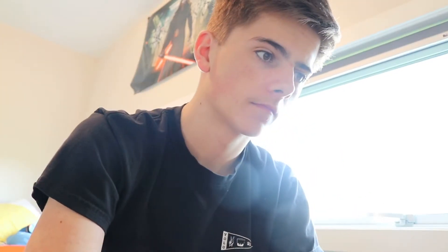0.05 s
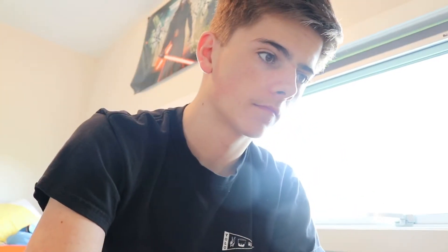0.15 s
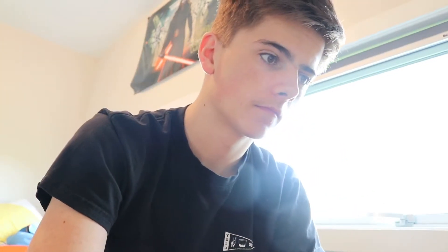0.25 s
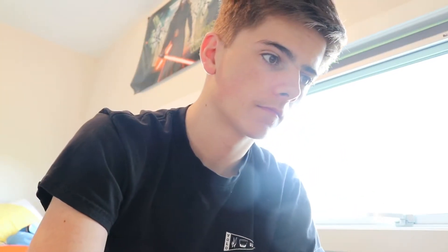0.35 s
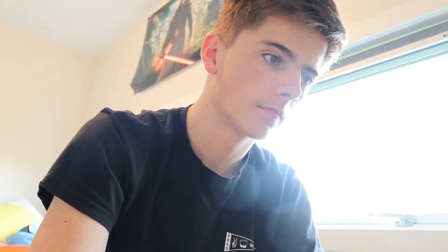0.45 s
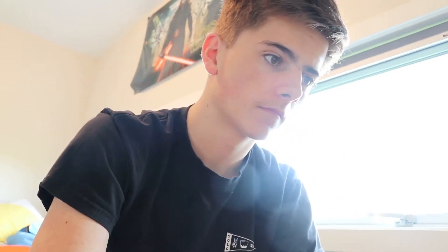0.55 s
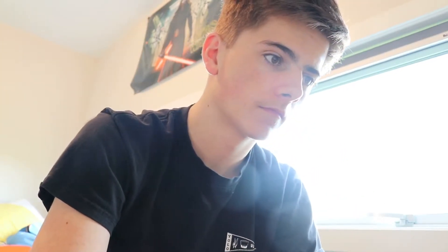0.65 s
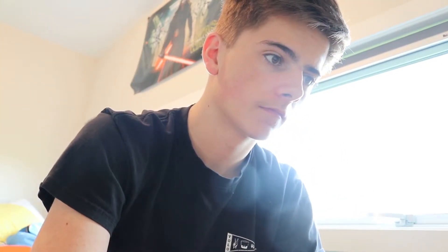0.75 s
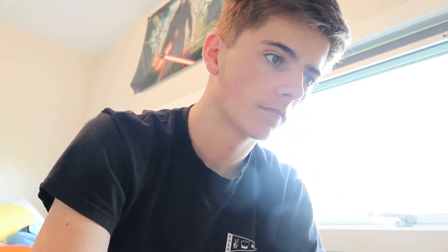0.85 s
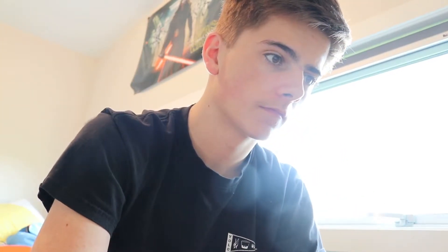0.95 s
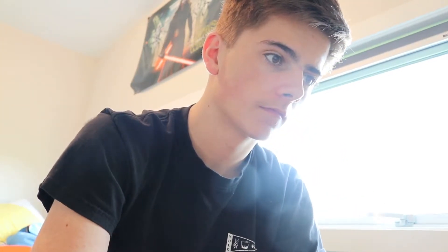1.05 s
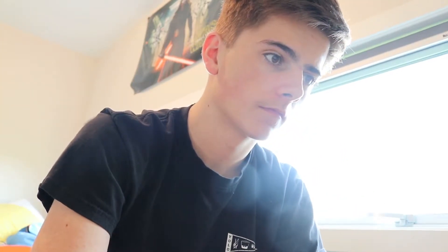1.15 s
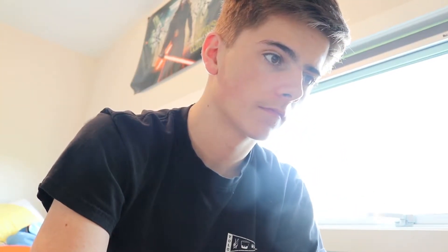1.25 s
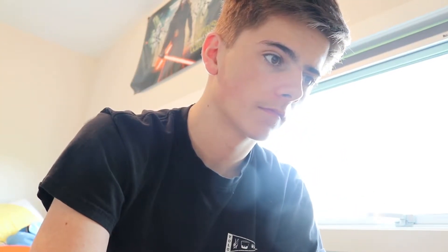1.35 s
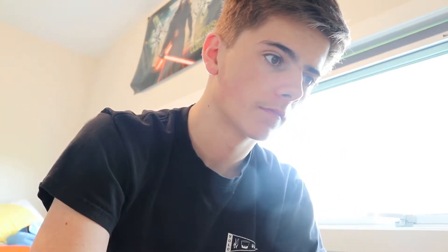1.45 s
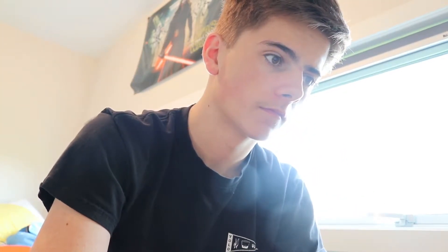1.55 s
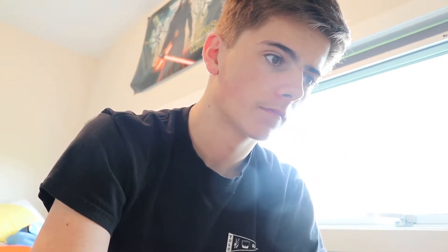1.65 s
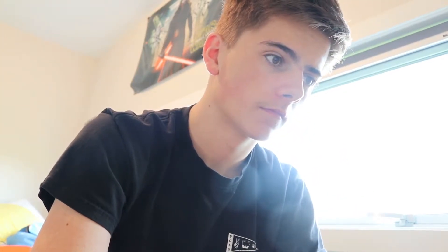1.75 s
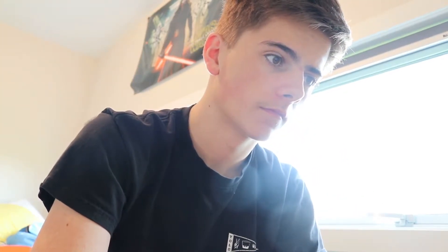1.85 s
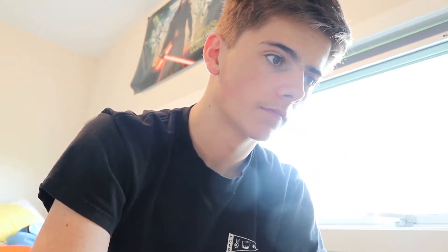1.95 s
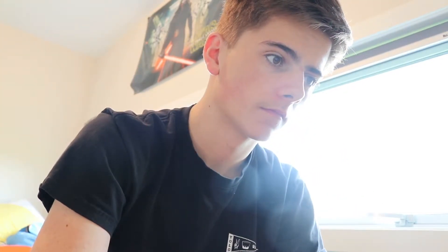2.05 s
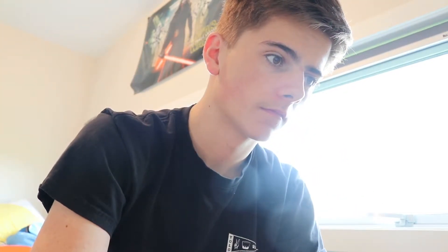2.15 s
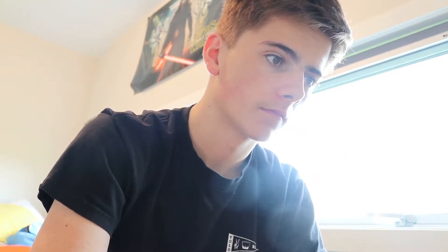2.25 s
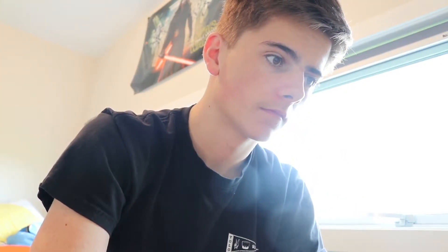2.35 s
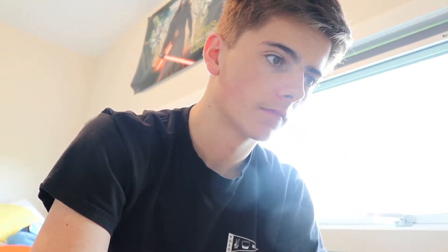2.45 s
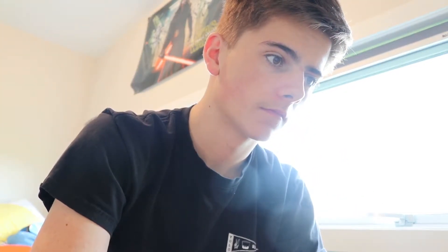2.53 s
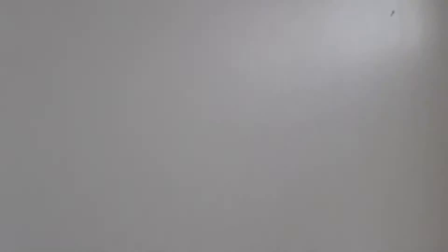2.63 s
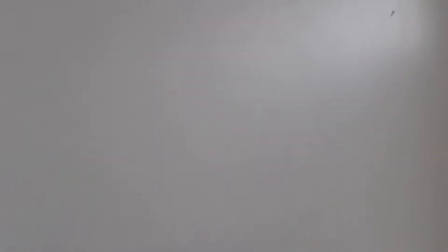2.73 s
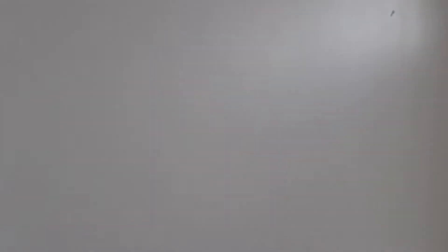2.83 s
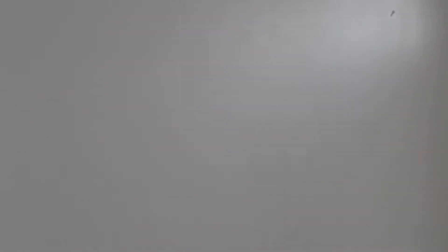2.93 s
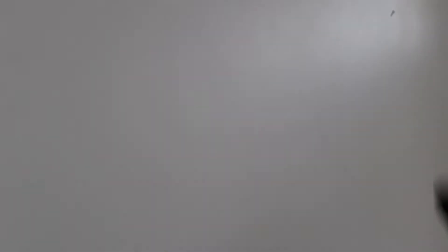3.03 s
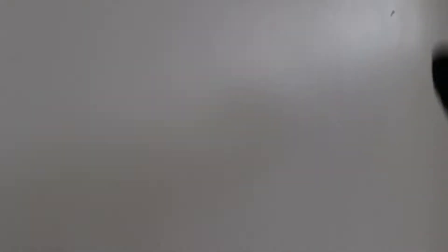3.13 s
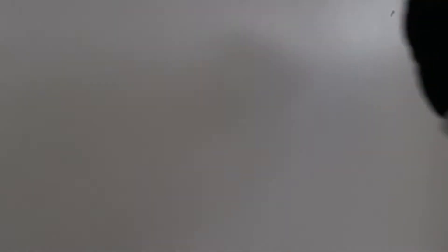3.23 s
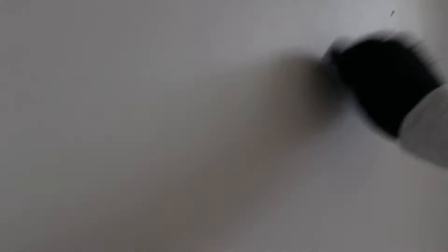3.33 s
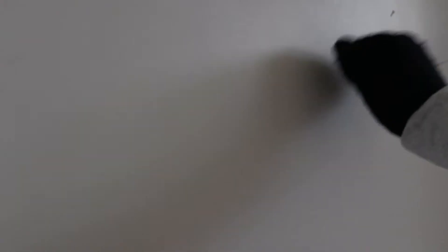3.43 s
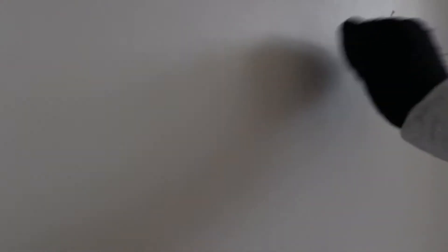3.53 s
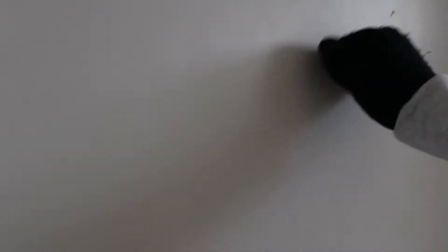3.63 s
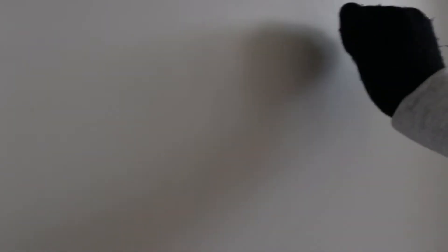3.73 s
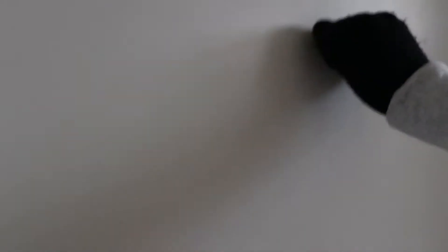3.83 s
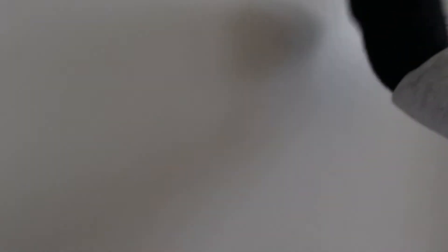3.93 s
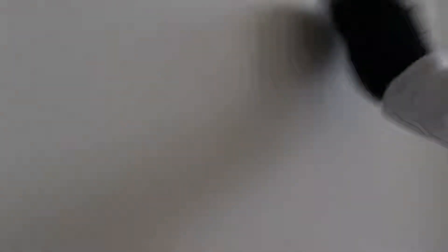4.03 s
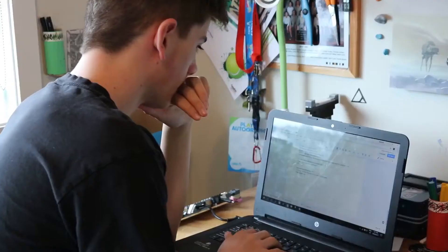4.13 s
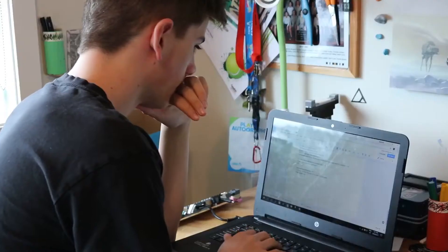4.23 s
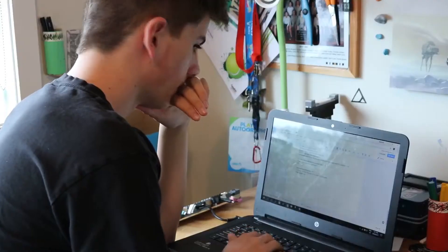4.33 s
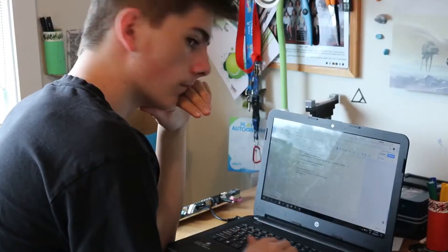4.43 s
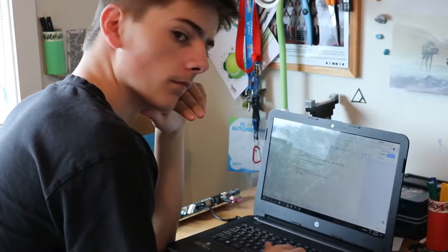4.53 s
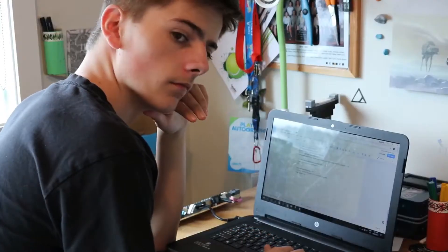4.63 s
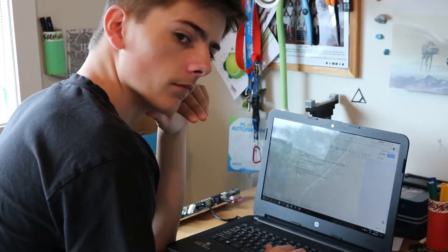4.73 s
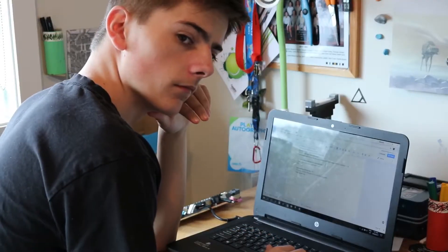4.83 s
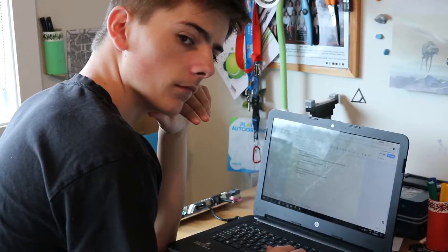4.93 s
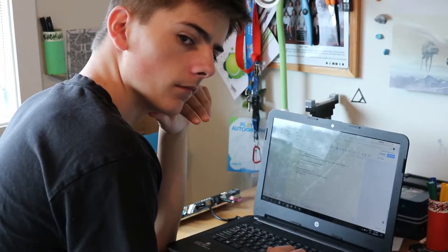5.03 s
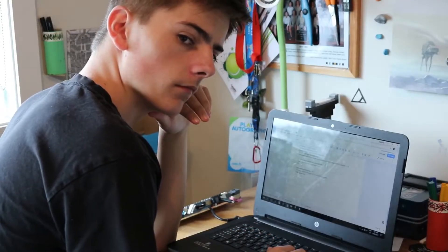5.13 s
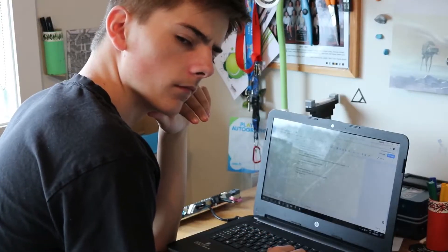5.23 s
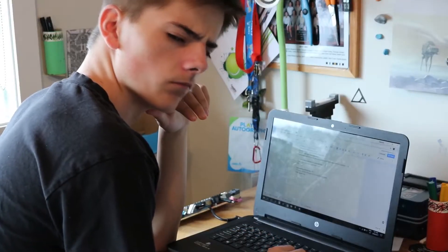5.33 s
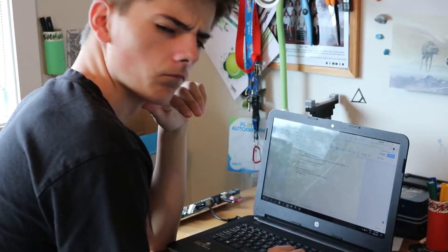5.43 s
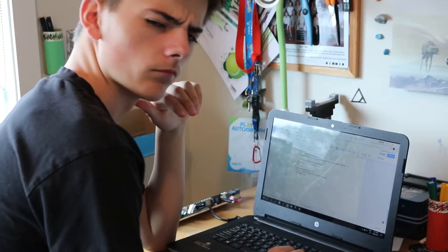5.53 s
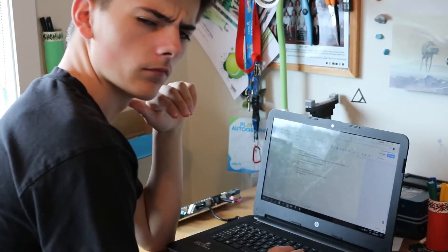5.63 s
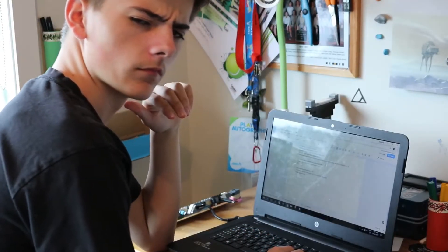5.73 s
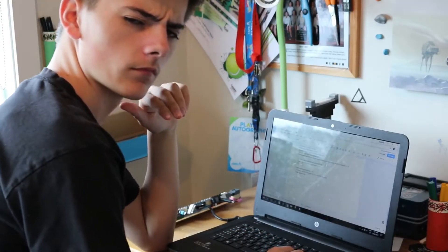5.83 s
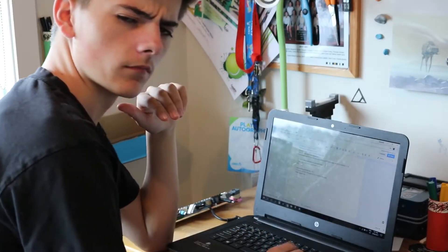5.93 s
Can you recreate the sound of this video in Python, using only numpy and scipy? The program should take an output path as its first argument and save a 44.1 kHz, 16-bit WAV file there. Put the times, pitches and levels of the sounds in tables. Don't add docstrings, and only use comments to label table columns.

```python
import sys
import numpy as np
from scipy import signal
from scipy.io import wavfile
from scipy.ndimage import uniform_filter1d

SR = 44100
rng = np.random.default_rng(int(sys.argv[2]) if len(sys.argv) > 2 else 0)


def wav_record(signal):
    frames = np.transpose(np.atleast_2d(signal))
    bounded = np.clip(frames, -1, 1)
    quanta = np.round(bounded * 32767).astype(np.int16)
    wavfile.write(sys.argv[1], SR, quanta)


def elevation(decibels):
    levels = np.asarray(decibels, float)
    return 10 ** (levels / 20)


N = 263718

CUT_S = 4.533
LEFT_LAG, DOOR_LAG = 7, 3

# f/Hz, level/dB per Hz
CLACK_COLOUR = [(530, -50.5), (900, -1), (1430, -5.5), (2070, -14.5), (3330, 4), (3950, -1.5), (4800, -9),
                (6240, -51), (10600, -120)]
# f/Hz, likeness/0..1
AIR_LIKENESS = [(60, 0.68), (130, 0.91), (290, 0.38), (640, 0.22), (1410, 0.061), (3100, 0), (6820, 0),
                (15000, 0)]


def evened(x):
    return x / np.sqrt(np.mean(x ** 2) + 1e-20)


def read(points, hz):
    f, value = np.transpose(points)
    return np.interp(np.log(hz + 1), np.log(f + 1), value)


def curve(s, level_db):
    gain = elevation(np.interp(np.arange(N) / SR, s, level_db, left=-120, right=-120))
    return uniform_filter1d(gain, size=1200)


def add(mix, s, sound):
    at = round(s * SR)
    sound = sound[:, max(-at, 0):]
    part = mix[:, max(at, 0):][:, :sound.shape[1]]
    part += sound[:, :part.shape[1]]


def noise(size, colour, same, t60=None, patchy_db=0., order=512):
    hop = order // 4
    frames, hz = size // hop + 5, np.fft.rfftfreq(order, 1 / SR)
    a, b, c, d, patches = rng.standard_normal((frames, len(hz), 5)).T
    patches = uniform_filter1d(patches, size=6, axis=0)
    patches = evened(uniform_filter1d(patches, size=12, axis=1))
    same = np.clip(read(same, hz), -1, 1)[:, None]
    left = a + 1j * b
    right = same * left + np.sqrt(1 - same ** 2) * (c + 1j * d)
    level_db = read(colour, hz)[:, None] + patchy_db * patches
    scale = np.sqrt(np.mean(elevation(2 * read(colour, hz))))
    if t60:
        level_db = level_db - 60 * np.arange(frames) * hop / SR / read(t60, hz)[:, None]
    spectra = np.array([left, right]) * elevation(level_db) / scale
    x = signal.istft(spectra, nperseg=order, noverlap=order - hop)[1][:, :size]
    return x / np.sqrt(order * 4 / 3)


def ring(modes, t, spread, beat_hz, share=0.099, build=1e-4):
    hz, level_db, t60 = np.transpose(modes)[:, :, None]
    detune, apart = rng.standard_normal((len(modes), 2)).T[:, :, None]
    decay = elevation(level_db - 60 * t / np.clip(t60, .02, 2))
    decay = decay * (1 - np.exp(-t / np.maximum(build, 1e-4)))
    turn = 2 * np.pi * hz * (1 + spread * detune) * t
    beat = 2 * np.pi * beat_hz * t
    upper = np.sin(turn + beat * (np.sign(apart) + apart / 2))
    lower = np.sin(turn - beat * np.sign(apart) * (2 + detune / 2) + detune)
    return (decay * (np.sin(turn) + share * (upper + lower))).sum(0) / 1.4


def causal(colour, size=1024):
    level_db = read(colour, abs(np.fft.fftfreq(size, 1 / SR)))
    log_gain = np.log(elevation(np.maximum(level_db, -100)))
    h = np.fft.ifft(np.exp(np.conj(signal.hilbert(log_gain)))).real[:size // 2]
    return h / abs(h).max()


def air():
    # f/Hz, level/dB per Hz
    room_colour = [(12, -48.5), (20, -13), (109, -2.5), (154, -10.5), (264, -4), (303, -12), (420, -9),
                   (720, -16), (1020, -14.5), (2000, -21.5), (2600, -51.5), (4400, -120)]
    hiss_colour = [(880, -19.5), (1500, -8), (1870, -11), (2020, -3), (2350, -1), (2640, -2), (3190, -3.5),
                   (5790, -8), (7270, -3.5), (11800, -5.5), (14300, -11.5), (15200, -7.5), (16100, -21.5)]
    rumble_colour = [(18, -58), (30, 0.5), (75, 1), (202, 2), (250, -8), (417, -4.5), (864, -12.5),
                     (983, -26), (1070, -14), (2400, -18.5), (5000, -44.5), (6500, -49.5), (11000, -120)]
    # f/Hz, level/dB
    hiss_edge = [(15600, 0), (16000, -40)]
    # t/s, level/dB
    outside = [
        (0, -65.5),
        (.6, -74.5),
        (.95, -71),
        (1.5, -66),
        (1.95, -76),
        (2.4, -64.5),
        (2.85, -70.5),
        (3.1, -64),
        (3.36, -69.5),
    ]
    hz = np.geomspace(800, 20000, num=200)
    edged = np.transpose([hz, read(hiss_colour, hz) + read(hiss_edge, hz)])
    room = elevation(-68.5) * evened(noise(N, room_colour, AIR_LIKENESS, patchy_db=2.0, order=1024))
    hiss = elevation(-71.5) * evened(noise(N, edged, AIR_LIKENESS, patchy_db=0.36))
    rumble = evened(noise(N, rumble_colour, AIR_LIKENESS, patchy_db=4.5, order=1024))
    return room + hiss + elevation(1.0) * curve(*np.transpose(outside)) * rumble


def thocks():
    # t/s, f/Hz, level/dB, t60/s
    case_rings = [(0.002, 636, -54.5, 0.05), (0.2228, 895, -32, 0.024), (0.226, 448, -48, 0.04),
                  (0.23, 1050, -41, 0.054), (0.28, 395, -53, 0.1), (0.299, 655, -53.5, 0.18),
                  (0.299, 426, -51.5, 0.15), (0.398, 661, -45, 0.069), (0.399, 476, -40.5, 0.07),
                  (0.474, 710, -60, 0.14), (1.294, 425, -51, 0.22), (1.297, 1043, -50, 0.15),
                  (1.3, 1880, -65, 0.24), (1.3, 1586, -59, 0.14), (1.536, 596, -65, 0.1),
                  (2.283, 423, -51, 0.18), (2.29, 1048, -55, 0.09), (2.405, 765, -61.5, 0.13),
                  (2.477, 446, -66, 0.05), (2.51, 660, -48, 0.053), (2.533, 662, -55, 0.12),
                  (2.682, 630, -45, 0.079), (2.93, 455, -61.5, 0.27), (2.945, 876, -55.5, 0.057)]
    out, t = np.zeros((2, N)), np.arange(SR // 4) / SR
    for s, *mode in case_rings:
        wave = ring([mode], t, 0, 15.0, share=0.27, build=0.0025)
        add(out, s, 2 * np.array([elevation(1.0) * np.roll(wave, LEFT_LAG), wave]))
    return out


def key(click_db, thump_db, body_db, clack_db, tail_db):
    # f/Hz, level/dB per Hz
    click_colour = [(2820, -28), (4800, -1), (5190, -2), (6250, 4), (6790, 4.5), (9110, 7.5), (10400, -2),
                    (13000, -5), (15800, -5), (16500, -26)]
    rattle_colour = [(710, -27), (1200, -2.5), (1580, -7), (2500, -4.5), (2850, -4), (5270, -8),
                     (6860, -1.5), (9130, -3.5), (15300, -10.5), (16000, -21.5), (16500, -47)]
    # f/Hz, t60/s
    rattle_t60 = [(1000, 0.47), (3000, 0.31), (8000, 0.34), (15000, 0.31)]
    # f/Hz, level/dB, t60/s
    desk_modes = [(226.4, 3, 0.12), (282, -23, 0.15), (352, -39, 0.045)]
    case_modes = [(449.5, 7.5, 0.055), (680, 2.5, 0.053), (1075, -4.5, 0.081), (1995, -25, 0.45)]
    t = np.arange(SR // 3) / SR

    grit = rng.standard_normal(len(t)) * elevation(3.7 * rng.exponential(1, len(t)))
    burst = (grit * (t / .0006) ** 2 * np.exp(-t / 0.00054))[:1000]
    click = signal.oaconvolve(burst, causal(click_colour))
    clack = signal.oaconvolve(burst, causal(CLACK_COLOUR))
    click = click / abs(click).max()
    clack = elevation(clack_db + 11.0) * clack / abs(clack).max()
    shaded = np.roll(elevation(-32.0) * click + elevation(-10.5) * clack, LEFT_LAG)
    near = elevation(6.0) * np.pad([shaded, click + clack], ((0, 0), (0, len(t) - len(click))))

    rattle_same = [(1000, 0.37), (8000, 0.072)]
    rattle = noise(len(t), rattle_colour, rattle_same, rattle_t60, patchy_db=2.5, order=256)
    wobble = evened(uniform_filter1d(rng.standard_normal(len(t)), size=90))
    shivers = elevation(0.98 * np.tanh(wobble))
    early = 1 + 3.6 * np.exp(-t / 0.0041)
    rattle = rattle * shivers * early * elevation([[-2.5], [0]]) * np.clip(t / 0.0051, 0, 1)

    desk = elevation(thump_db + 2.0) * ring(desk_modes, t, 0.016, 4.0) * (1 - np.exp(-t / 0.0097))
    case = elevation(body_db - 2.0) * ring(case_modes, t, .012, 12.) * (1 - np.exp(-t / 0.0092))
    wood_colour = [(150, -28.0), (300, -6.0), (1200, -8.5), (2500, -23.5), (5000, -40)]
    wood = noise(len(t), wood_colour, [(300, 0.73), (2000, 0.26)], [(300, 0.46), (2000, 0.14)])
    wood = elevation(body_db - 2.5) * wood * np.clip(t / 0.001, 0, 1)
    return elevation(click_db) * (near + elevation(tail_db - 5.0) * rattle + desk + case + wood)


def contacts(rows):
    out = np.zeros((2, N))
    for s, *row in rows:
        add(out, s, key(*row))
    return out


def typing():
    # t/s, click level/dB, then desk, case, rattle/dB re click
    strokes = [(0.2224, -21, -22, -13.5, -12), (0.231, -40, -19, -46, -18), (0.395, -31, -8, -9.5, -16.5),
               (1.1884, -51, -10, -5, -2.5), (1.2922, -32, -11, -11, -7), (2.174, -44.5, -3, -5.5, -11),
               (2.2817, -34, -20, -9, -9.5), (2.368, -37.5, -15.5, -16.5, -10.5),
               (2.4751, -38.5, -9.5, -6.5, -4), (2.5107, -41, -21, -8, -12), (2.5292, -44, 3.5, -23, -19),
               (2.6788, -39.5, 6.5, -2.5, -6), (2.684, -40, -26, -4.5, -7), (2.711, -51, 10.5, -17, -16),
               (2.7221, -48.5, -1, -31, -5), (3.0909, -53, -0.5, -1.5, 3)]
    # t/s, click level/dB, then clack, rattle/dB re
    light_contacts = [(0.0034, -38.5, -27, -12.5), (0.2199, -24, -40, -6.5), (0.222, -27, -45, -26),
                      (0.2992, -24, -30, -15.5), (0.3935, -30, -40, -12), (0.473, -47, -34, -52),
                      (0.4828, -36, -27, -13), (0.492, -45, -30, -47), (1.347, -37, -27, -13),
                      (1.533, -40, -32, -11.5), (1.6434, -49, -31, -11.5), (1.702, -50.5, -23, -12),
                      (1.7568, -47.5, -23, -9.5), (2.4051, -44, -26, -9), (2.797, -42, -20, -7.5),
                      (2.9279, -38, -30, -17), (2.9383, -33.5, -29, -9), (3.072, -47, -30, -15),
                      (3.0815, -42.5, -39, -11)]
    # t/s, click level/dB
    touches = [(0.59, -51.5), (0.683, -56.5), (0.8, -56), (0.853, -56.5), (1.0754, -58), (1.2383, -55.5),
               (1.469, -52), (1.947, -54), (2.018, -59), (2.2093, -58), (2.2335, -59), (2.316, -45),
               (2.561, -58), (2.7765, -53), (2.872, -51.5), (2.893, -49)]
    # t/s, click level/dB, then desk, case, clack, rattle/dB re click
    latch = [
        (3.9207, -63, -28, -40, -6.5, -7.5),
    ]
    rows = [(s, c, desk, case, -18.5, tail) for s, c, desk, case, tail in strokes]
    rows += [(s, c, -62 - c, -58.5 - c, clack, tail) for s, c, clack, tail in light_contacts]
    rows += [(s, c, -14, -11, -19.5, -11) for s, c in touches]
    return contacts(sorted(rows) + list(latch))


def snaps():
    # t/s, snap level/dB, clack/dB re snap
    hard_contacts = [(0.0035, -35, -22), (0.095, -48, -15), (0.2236, -14, -10.5), (0.2991, -24, -28),
                     (0.397, -31, -25), (0.4836, -21, -19), (1.2917, -32, 1.5), (1.302, -42, -10),
                     (1.3482, -39, -3.5), (2.1752, -60, -4), (2.2792, -39, -18), (2.2839, -32, -5),
                     (2.3717, -40, -18), (2.4095, -33, -20), (2.419, -48, -20), (2.4735, -41, -15),
                     (2.48, -34.5, -4), (2.536, -35.5, -22), (2.682, -35, -20), (2.724, -37, -11),
                     (2.9421, -27, -20), (3.0725, -42, -18), (3.0832, -27.5, -26), (3.09, -36.5, -24),
                     (0.4725, -40, -25), (2.514, -37, -20), (3.382, -66, 20), (3.61, -68, 20),
                     (3.822, -68, 22), (4.007, -68, 22), (4.085, -56, 18)]
    # f/Hz, level/dB per Hz
    snap_colour = [(2800, -34), (4500, -13.5), (6200, -6), (7500, 0), (9200, 0.5), (11000, -9.5),
                   (14000, -18), (16500, -28)]
    chatter_s = 0.0004
    out, t = np.zeros((2, N)), np.arange(100) / SR
    snap_h, clack_h = causal(snap_colour), causal(CLACK_COLOUR)
    for s, snap_db, clack_db in hard_contacts:
        grit = rng.standard_normal(len(t))
        impact = ((t == 0) + 0.35 * grit) * np.exp(-t / chatter_s)
        snap, clack = np.convolve(impact, snap_h), np.convolve(impact, clack_h)
        snap = snap / abs(snap).max()
        clack = elevation(clack_db) * clack / abs(clack).max()
        shaded = np.roll(elevation(-18) * snap + elevation(-12) * clack, LEFT_LAG)
        add(out, s, elevation(snap_db) * np.array([shaded, snap + clack]))
    return out


def booms():
    # t/s, low wave level/dB, upper wave level/dB
    firm_strokes = [(0.226, -60, -53.5), (0.297, -75, -55), (0.398, -53, -65), (1.189, -65, -82),
                    (1.293, -58, -49.5), (1.349, -59, -56.5), (1.548, -64, -86), (2.282, -57, -57),
                    (2.37, -64, -81), (2.474, -59, -59), (2.68, -59, -50), (2.929, -69, -65)]
    # f/Hz, t60/s, build-up/s
    standing = [(53, 0.4, 0.0062), (150.1, 0.3, 0.01)]
    out, t = np.zeros((2, N)), np.arange(SR // 2) / SR
    for s, *levels_db in firm_strokes:
        for level_db, (hz, t60, build) in zip(levels_db, standing):
            wave = ring([(hz, level_db, t60)], t, 0.023, 1.95) * (1 - np.exp(-t / build))
            add(out, s, 3 * np.array([wave, wave]))
    return out


def settling():
    # t/s, click level/dB, clack/dB re click
    late_ticks = [
        (1.2879, -46, -18),
        (1.304, -59, -23),
        (1.651, -55, -16),
        (2.691, -47, -28),
        (2.715, -57, -21),
        (2.931, -43, -30),
        (2.95, -47, -27),
        (3.085, -46, -25),
        (3.411, -56, -27),
    ]
    return contacts([(s, c, -46, -78, clack, -26.5) for s, c, clack in late_ticks])


def knock(blow_db, ring_db, hall_db, echo_db, contact, spot_db, colour, delay, back_db, fall):
    # f/Hz, t60/s, build-up/s
    panel_modes = [(50.3, 0.43, 0.022), (177.1, 0.6, 0.035), (227.2, 0.62, 0.025), (285, 0.12, 0.00299),
                   (346.7, 0.79, 0.013), (396.7, 0.28, 0.0098), (506.5, 0.47, 0.0015), (647, 0.45, 0.0054),
                   (745, 0.34, 0.0032), (855, 0.68, 0.0048), (908, 0.48, 0.01018), (970, 0.55, 0.0041),
                   (1126, 0.27, 0.013), (1180, .5, .01)]
    # f/Hz, level/dB per Hz
    frame_colour = [(2650, -40), (4500, -13.5), (7490, 5), (8740, -4), (12500, -4.5), (13600, -13),
                    (15100, -12), (16000, -14)]
    # f/Hz, t60/s
    hall_t60 = [(50, 1), (200, 0.83), (500, 0.86), (900, 0.86), (1500, 0.99), (3000, 1)]
    # f/Hz, likeness/0..1
    hall_same = [(60, 1.0), (130, 1.0), (290, 0.85), (640, 0.61), (1410, 0.42), (3100, 0.5), (6820, 0.032),
                 (15000, 0.17)]
    t = np.arange(SR) / SR

    knuckle_s = 0.00059
    push = np.pad(causal(contact, size=2048), (0, SR - 1024))
    push = signal.oaconvolve(push, np.exp(-(t[:100] / knuckle_s * 2 - 2) ** 2))[:SR]
    push = push / abs(push).max()

    echoes = elevation(echo_db) * noise(SR, contact, hall_same, [(300, 0.14), (2000, 0.07), (5000, 0.05)])
    modes = [(hz, level_db, t60) for (hz, t60, _), level_db in zip(panel_modes, spot_db)]
    build = np.transpose(panel_modes)[2][:, None]
    panel = elevation(ring_db) * ring(modes, t, 0, 9.94, share=0.4, build=build)

    hall = elevation(hall_db) * noise(SR, colour, hall_same, hall_t60, patchy_db=2.0, order=1024)
    back = np.exp(-((t - delay) / np.where(t < delay, 0.029, fall)) ** 2)
    hall = hall * (1 + elevation(back_db) * back)

    frame = elevation(-54) * evened(noise(SR, frame_colour, hall_same, order=256))
    frame = frame * (t / 0.002) ** 2 * np.exp(-t / 0.0026)
    rise = np.sin(np.pi / 2 * np.clip(t / 0.0046, 0, 1)) ** 2
    return elevation(blow_db) * push + frame + rise * (panel + echoes + hall)


def door():
    # t/s, blow level/dB, panel ring/dB, hallway/dB, first echoes/dB
    knocks = [
        (3.3822, -11.5, -27, -25.5, -17.5),
        (3.609, -14, -11.5, -26.5, -16.5),
        (3.8209, -11.5, -19, -27.5, -15),
        (4.0837, -11, -20, -25, -16),
    ]
    # f/Hz, level/dB per Hz
    blows = [
        [(247, -9), (632, -15), (1390, -20), (2150, -48), (2340, -40), (3380, -44.5), (5500, -57)],
        [(288, -4.5), (643, -13), (1180, -17.5), (2050, -49), (2300, -29.5), (2670, -42.5), (5500, -51)],
        [(264, -4.5), (572, -3.5), (1010, -23.5), (1820, -28.5), (2300, -29.5), (4500, -51.5), (5500, -59.5)],
        [(562, -6.5), (800, -23), (1490, -7), (1730, -22.5), (2860, -24.5), (3930, -45.5), (5500, -44.5)],
    ]
    spots = [
        (-9.5, 3, -9, -9, -5.5, -8, -6, -14.5, -13, -18, -17.5, -18.5, -13, -18.5),
        (-15.5, -20.5, -17.5, -3.5, -18, -14.5, -24, -31.5, -26, -32.5, -35.5, -35, -34.5, -36),
        (-10, -6.5, -8, 6.5, -8.5, -5.5, -10, -25, -16, -32.5, -34.5, -40, -35.5, -36.5),
        (-30, -2, -12.5, -13, -15, -5, -8, -19, -23, -24, -31, -21.5, -21, -30),
    ]
    # f/Hz, level/dB per Hz
    hall_mids = [
        [(174, -2.5), (317, -8), (355, -13), (470, -27), (517, -12), (600, -17.5), (925, -21.5), (1540, -38)],
        [(161, -11), (283, -2), (355, 3.5), (462, -29.5), (517, -15.5), (685, -21.5), (842, -20), (1370, -35)],
        [(161, -13), (289, -1.5), (317, -4), (348, 1), (453, -11.5), (517, -10.5), (700, -13.5), (978, -31.5)],
        [(171, -8), (317, -19), (397, -7.5), (660, -12), (796, -26), (960, -15), (1600, -26.5), (1850, -38)],
    ]
    # delay/s, level/dB re hallway, fall/s
    returns = [
        (0.093, -3, 0.035),
        (0.094, -5, 0.036),
        (0.096, -0.5, 0.069),
        (0.116, -4.5, 0.21),
    ]
    # f/Hz, level/dB per Hz
    hall_low = [(26, -38), (45, -4), (90, -6.5), (130, -18.5)]
    hall_high = [(3000, -50), (5200, -85), (8800, -120)]
    blow_low = [(59, -34), (100, -11)]
    blow_high = [(7150, -89), (12100, -120)]
    # f/Hz, level/dB per Hz
    hall_air = [(120, -39), (200, -25.5), (493, -6.5), (637, -2), (779, -28.5), (892, -10), (1180, -8.5),
                (2500, -23.5), (4500, -39.5), (11000, -120)]
    t = np.arange(N) / SR
    out = elevation(-65.5) * evened(noise(N, hall_air, AIR_LIKENESS)) * (t > knocks[0][0])
    for (s, *levels_db), blow, spot_db, mids, back in zip(knocks, blows, spots, hall_mids, returns):
        contact = [*blow_low, *blow, *blow_high]
        colour = [*hall_low, *mids, *hall_high]
        add(out, s, knock(*levels_db, contact, spot_db, colour, *back))
    out = np.array([np.roll(out[0], DOOR_LAG), out[1]])
    return out * np.clip((CUT_S - t) / 0.0022, 0, 1)


def flares():
    # t/s, f/Hz, level/dB, t60/s, build-up/s
    swells = [(3.383, 726, -34.5, 0.21, .004), (3.392, 272, -32.5, 0.081, 0.0054),
              (3.435, 397, -32.5, 0.14, 0.014), (3.425, 180, -30.5, 0.27, 0.0097),
              (3.467, 196.5, -28, 0.11, 0.016), (3.612, 291, -22.5, 0.19, 0.0054),
              (3.61, 746, -30, 0.15, 0.0045), (3.655, 502, -29, .08, 0.005),
              (3.395, 406, -32.5, 0.13, 0.0069), (3.64, 349.6, -32, .15, .012), (3.69, 320, -29, .15, .012),
              (3.735, 300, -31, .12, .01), (3.62, 400, -26, .15, .006), (3.822, 265, -22.5, 0.095, 0.0072),
              (3.822, 733, -35, 0.17, 0.0068), (3.874, 381, -28, .15, 0.013), (3.91, 258, -26, .12, .01),
              (3.94, 335, -26, .25, .015), (3.925, 760, -40, .2, .015), (4.005, 640, -44, .08, .004),
              (4.03, 260, -36, .2, 0.011), (4.085, 509, -19.5, 0.062, 0.0025),
              (4.09, 399.8, -23.5, 0.27, 0.0093), (4.169, 171, -24, 0.3, 0.03), (4.27, 561, -41, 0.25, .02),
              (4.11, 170, -30, .3, .02), (4.18, 280, -32, .2, .02), (4.19, 520, -34, .2, .015)]
    out, t = np.zeros((2, N)), np.arange(SR // 2) / SR
    for s, *mode, build in swells:
        wave = ring([mode], t, 0, 6.0, share=0.13, build=build)
        add(out, s, 2 * np.array([np.roll(wave, DOOR_LAG), wave]))
    return out * (np.arange(N) / SR < CUT_S)


def shirt():
    # f/Hz, level/dB per Hz
    slow_colour = [(3800, -27.5), (5300, -8.5), (6200, -4), (7000, -13), (7800, -36)]
    quick_colour = [(1800, -28.5), (2600, -7.5), (4000, -13), (6800, -13), (8580, -3), (9870, -7.5),
                    (12900, -14), (15700, -23), (16000, -60.5)]
    # t/s, hold/s, level/dB, brightness/dB
    rubs = [
        (3.398, 0.14, -81, 8.5),
        (3.656, 0.062, -84, 5),
        (4.14, 0.016, -88, 8),
        (4.271, 0.09, -72.5, 0),
        (4.504, 0.014, -80, 13.5),
    ]
    rise_s, fall_s, edge_db = 0.12, 0.13, -20
    apart, out = [(5000, .3), (12000, 0.25)], 0
    slow = evened(noise(N, slow_colour, apart, patchy_db=2.0, order=256))
    quick = evened(noise(N, quick_colour, apart, patchy_db=2.0, order=256))
    for s, hold, rub_db, bright_db in rubs:
        stroke = curve([s - rise_s, s, s + hold, s + hold + fall_s], [edge_db, 0, 0, edge_db])
        out = out + elevation(rub_db) * stroke * (slow + elevation(bright_db) * quick)
    return elevation(4.0) * out


def scene():
    laptop = typing() + thocks() + snaps() + booms() + settling()
    return laptop + door() + flares() + shirt() + air()


def roll_off(x):
    return signal.sosfilt(signal.butter(12, 16970, fs=SR, output="sos"), x)


def record(dry):
    power_db = 10 * np.log10(abs(uniform_filter1d((dry ** 2).mean(0), size=200)) + 1e-12)
    fall = np.arange(N) * 38.0 / SR
    over_db = np.maximum(np.maximum.accumulate(power_db + fall) - fall + 22.5, 0)
    ducked = dry / elevation(0.12 * uniform_filter1d(over_db, size=100))
    bass_cut = signal.butter(2, 38, "high", fs=SR, output="sos")
    ducked = signal.sosfilt(bass_cut, ducked)
    treble_cut = signal.firwin(255, 16550, fs=SR)
    mix = signal.oaconvolve(ducked, treble_cut[None], "same")
    return roll_off(mix)


dry = scene()
out = record(dry)
wav_record(out)
```